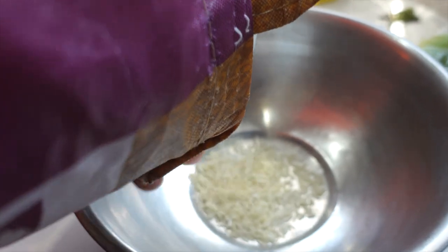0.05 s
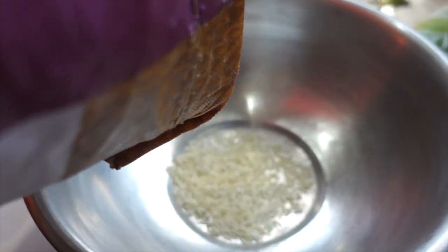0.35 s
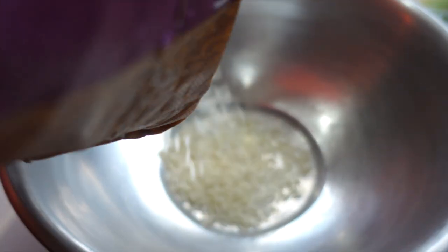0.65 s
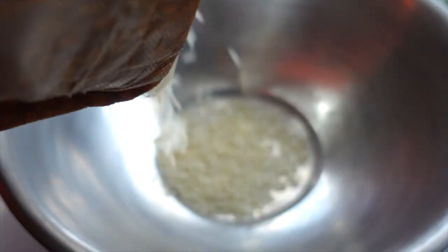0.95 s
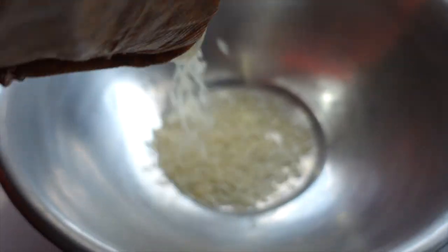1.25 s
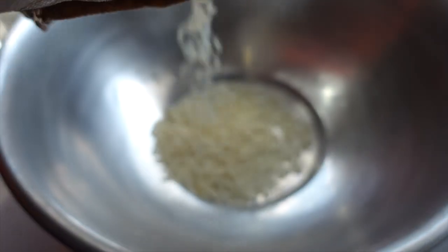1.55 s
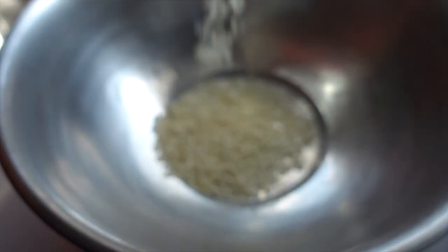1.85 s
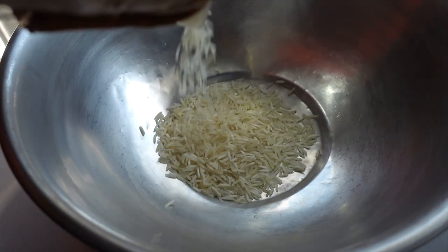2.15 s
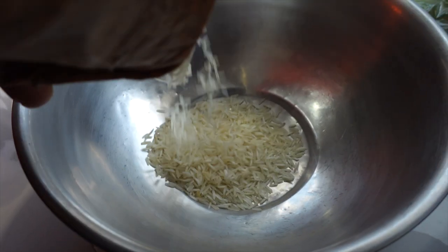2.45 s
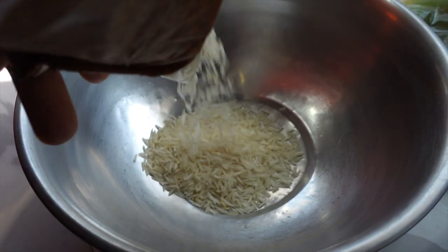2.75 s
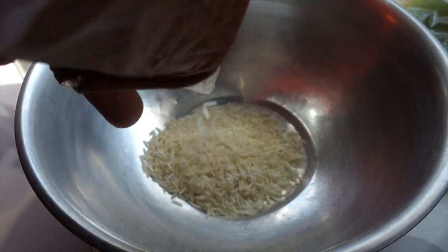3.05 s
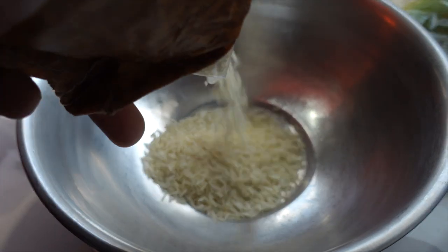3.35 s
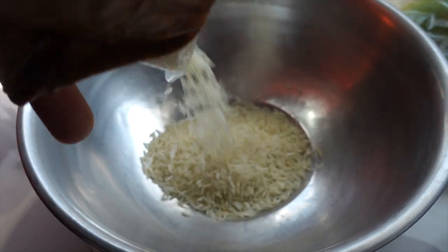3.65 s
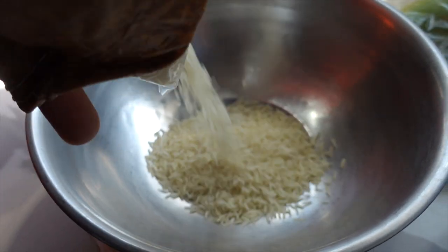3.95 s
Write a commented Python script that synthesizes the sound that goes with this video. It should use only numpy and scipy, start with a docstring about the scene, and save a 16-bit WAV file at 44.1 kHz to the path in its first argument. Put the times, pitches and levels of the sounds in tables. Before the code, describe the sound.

Rice grains patter from a crackling bag into a metal bowl in an uneven stream.

```python
"""Dry rice pours from a bag into a steel bowl, close by in a kitchen.
Grains patter on the heap; those that hit bare steel tick brightly and make the bowl ring.
The stream swells and thins, with small clumps and stray grains. The bag buckles with short pops,
and the bowl takes a few soft knocks. Faint air noise and an appliance hum lie behind it all."""
import sys
import numpy as np
from scipy import signal
from scipy.fft import rfft, irfft
from scipy.io import wavfile
from scipy.ndimage import uniform_filter1d

SR = 44100
rng = np.random.default_rng(int(sys.argv[2]) if len(sys.argv) > 2 else 0)


def persist_wave(psi):
    """Save psi, clipped to +-1, as 16-bit WAV."""
    counts = np.round(np.clip(psi, -1, 1) * 32767).astype(np.int16)
    wavfile.write(sys.argv[1], SR, np.atleast_2d(counts).T)


N = 176400  # 4 seconds

# how strongly the rice flows (time [s], bright ticks [dB], dull patter [dB])
RICE_FLOW = [(0.0, -25, -35), (0.11, -35.5, -44.5), (0.13, -36.5, -40.5), (0.29, -50.5, -49.5),
             (0.36, -58, -52), (0.435, -59.5, -51), (0.50, -41.5, -44), (0.63, -49, -41), (0.645, -39, -42),
             (0.695, -26.5, -31), (0.715, -20.5, -33.5), (1.01, -22, -38), (1.047, -28, -33.5),
             (1.056, -21, -33.5), (1.27, -21.5, -37.5), (1.44, -41, -44.5), (1.51, -39, -42),
             (1.55, -32, -38), (1.575, -34.5, -40.5), (1.85, -40.5, -40.5), (2.02, -37.5, -36),
             (2.19, -28.5, -40), (2.22, -27.5, -39), (2.36, -31, -39), (2.44, -26, -36.5),
             (2.61, -26.5, -40), (2.73, -39, -40), (2.79, -30.5, -40.5), (2.858, -41, -35.5),
             (2.87, -29.5, -35.5), (3.02, -30, -38), (3.22, -38.5, -39), (3.352, -41, -36.5),
             (3.36, -29, -34), (3.44, -33, -36.5), (3.47, -26, -33), (3.61, -23, -34.5), (3.78, -21, -34.5),
             (4.0, -22, -31)]
# grains that land together (time [s], level [dB])
RICE_CLUMPS = [(0.025, -25), (0.043, -46), (0.087, -22), (0.193, -35.5), (0.239, -32.5), (0.376, -39),
               (0.394, -36.5), (0.444, -34.5), (0.475, -36), (0.488, -46), (0.512, -25), (0.519, -43.5),
               (0.558, -31), (0.637, -32), (0.648, -24.5), (0.709, -22), (1.053, -17.5), (1.585, -23.5),
               (1.722, -27), (1.88, -28.5), (1.929, -29.5), (1.982, -25.5), (2.042, -28), (2.195, -31),
               (2.212, -20.5), (2.233, -22), (2.305, -25.5), (2.375, -22), (2.42, -24.5), (2.446, -19.5),
               (2.482, -21), (2.589, -23.5), (2.606, -28), (2.672, -24.5), (2.772, -24), (2.864, -26),
               (2.923, -29), (3.137, -30), (3.357, -21.5), (3.378, -35), (3.45, -20.5), (3.465, -22),
               (3.488, -21), (3.541, -18), (3.636, -17.5), (3.723, -22), (3.919, -18)]
# tone of grains on steel (frequency [Hz], level [dB])
TICK_TONE = [(300, -77), (1000, -38), (3900, -27), (4500, -1), (5100, 0), (6000, 1.45), (8000, 1.26),
             (9700, 0), (11200, -7.5), (13000, -13.5), (15700, -18)]
# tone of grains on the heap (frequency [Hz], level [dB])
PATTER_TONE = [(60, -63), (250, -29), (520, -20.5), (700, -3), (870, -4.5), (1200, 1.5), (2000, 1.5),
               (2900, 4), (4800, 2.5), (8000, -1.5), (15000, -22)]
# how much rice hits bare steel (time [s], ring compared with the ticks [dB])
STEEL_CONTACT = [(0, -9), (.6, -3), (.72, -3), (.9, 1), (1.27, 1), (1.5, -16), (2.1, -13), (2.22, -2),
                 (2.6, -5), (2.75, -16), (4, -19)]
# how much rice hits the bowl's sloping side (time [s], level [dB])
SLOPE_CONTACT = [(1.3, -2), (1.5, -8)]
# notes of the steel wall (pitch [Hz], level [dB], time to fade 60 dB [s], place [0 base, 1 slope])
WALL_NOTES = [(1136, 0, 0.028, 0), (1268, 2, 0.023, 0), (1510, -7, 0.013, 1), (4203, 7, 0.039, 1),
              (4750, -2, 0.052, 1), (5445, 6.5, 0.026, 0), (5540, 9, 0.066, 0), (5920, 2, 0.036, 0),
              (6006, 10, 0.053, 1), (6190, -3.5, 0.064, 1), (6270, 4, 0.059, 0), (6810, 3, 0.067, 1),
              (6760, 3, 0.12, 0)]
# the bag buckles (time [s], snap level [dB], pitch [Hz], thump level [dB])
BAG_POPS = [(.302, -16, 1080, -57), (0.4387, -24.5, 1070, -50), (.4612, -6.5, 1880, -49),
            (0.4726, -32, 800, -39.5), (0.5975, -12, 1250, -45.5), (0.6452, -20, 816, -51.5),
            (0.7759, -20.5, 870, -43), (1.029, -31.5, 840, -49), (1.586, -16.5, 2200, -69),
            (2.0445, -20.5, 1250, -71), (2.217, -26, 1000, -63), (2.2325, -13.5, 1180, -37),
            (3.099, -36, 1190, -48), (3.182, -22, 1060, -63), (3.304, -19, 1700, -64),
            (3.338, -12.5, 1360, -41), (3.464, -14.5, 1250, -67), (3.49, -26, 1210, -61),
            (3.665, -25, 1200, -58), (3.719, -26, 885, -39)]
# tone of the bag's thump (frequency [Hz], level [dB])
THUMP_TONE = [(50, -19), (130, -10.5), (260, 2), (550, 7), (1000, -4), (3000, -45)]
# soft knocks on the bowl (time [s], level [dB])
BOWL_KNOCKS = [(1.76, -57), (1.947, -53), (2.011, -54), (2.233, -40), (2.35, -46), (3.11, -54),
               (3.667, -51)]
# low notes of the whole bowl (pitch [Hz], level [dB], time to fade 60 dB [s])
BOWL_NOTES = [(161, -10.5, 0.036), (292, 2.5, 0.059), (375, -17, 0.13)]
# tone of the kitchen air (frequency [Hz], level [dB])
AIR_TONE = [(25, -8), (60, 5), (200, 3), (700, -2), (3000, -4), (15000, -3)]
# how wide the sound spreads (frequency [Hz], gain of the side signal [dB])
STEREO_WIDTH = [(200, -14), (2000, -26), (4000, -22.5), (6000, -18), (8000, -9), (14000, -9)]
# which way the sound leans (frequency [Hz], left compared with right [dB])
STEREO_BALANCE = [(200, .5), (1200, -0.5), (4500, -1), (8000, -2.6), (12000, 0.8)]

TICKS_PER_S, PATTERS_PER_S, FULL_FLOW_DB = 1100, 2200, -25  # grain rates at this flow level
RATE_DB_PER_DB, PATTER_BOOST_DB, SIZE_SPREAD_DB = 0.5933, 5, 3
SURGES_PER_S, SURGE_S, SURGE_SHARE = 360, 0.0044, 0.2
TOUCH_S, RATTLE_S, RATTLE_DB = 0.001, 0.005, 8
CLUMP_S, CLUMP_GRAINS_PER_S, FIRST_GRAIN_DB = 0.013, 4000, 6
CLUMP_DULL_DB, CLUMP_DULL_SHARE = -3, 0.46  # a clump takes on part of the stream's dullness
STRAYS_PER_S, STRAY_DB, CLEAN_TICK_S = 150, -15, 0.0012
DETUNE = 0.006  # rough share by which rice shifts a wall note
SNAP_CYCLES, THUMP_S = 0.8, 0.014
CRACK_S, CRACK_DB, CRACK_AT_HZ, CRACK_DB_PER_OCTAVE = 0.0007, -13.5, 1460, 15.5
ECHO_DELAY_S, ECHO_FADE_S, ECHO_DB = 0.00238, 0.0013, -10
HANDLING_SIDE_DB, HANDLING_SPREAD_S = 7.5, 0.0015
AIR_DB, HUM_DB, HUM_HZ = -73.5, -88, 98
ROOM_FADE_S, ROOM_MID_DB, ROOM_SIDE_DB = 0.2, -15.5, -5.5  # the room's echo fades 60 dB in this time


def rice():
    """Grains tick on the steel, patter on the heap and ring the bowl; returns mid and side."""
    bright_db, dull_db = curve(RICE_FLOW, column=1), curve(RICE_FLOW, column=2)
    hard_hits = stream(bright_db, TICKS_PER_S)
    soft_hits = undb(PATTER_BOOST_DB) * stream(dull_db, PATTERS_PER_S)
    clump_hits = clumps()
    stray_hits = strays((bright_db + dull_db) / 2)
    crisp = land(clump_hits + stray_hits, lambda: burst(CLEAN_TICK_S, size=256))
    on_heap = undb(CLUMP_DULL_DB + CLUMP_DULL_SHARE * (dull_db - bright_db))
    ticks = [through(part, tone(TICK_TONE)) for part in land(hard_hits, grain_click) + crisp]
    patter = [through(part, tone(PATTER_TONE)) for part in land(soft_hits, grain_click) + on_heap * crisp]
    steel_hits = (hard_hits + clump_hits) * undb(curve(STEEL_CONTACT))
    return steel_ring(steel_hits) + ticks + patter


def stream(db, per_s):
    """Falling grains: a stronger flow brings more of them."""
    rate = per_s * undb(RATE_DB_PER_DB * (db - FULL_FLOW_DB))
    return grains(undb(db) * surging(), rate)


def surging():
    """The flow bunches up at random: each surge starts at once and dies away."""
    t = np.arange(SR // 10) / SR
    starts = (rng.random(N) < SURGES_PER_S / SR) * 1.
    surges = np.abs(through(starts, np.exp(-t / SURGE_S)))
    surges /= uniform_filter1d(surges, size=4000) + 0.013
    return np.sqrt(1 - SURGE_SHARE + SURGE_SHARE * surges)


def grains(gain, per_s):
    """Hits of uneven size at random times, evened out so that gain sets their overall level."""
    lands = rng.random(N) < per_s / SR
    sizes = undb(SIZE_SPREAD_DB * np.clip(rng.standard_normal(N), -2, 1.6))
    hits = lands * sizes * rng.choice([-1, 1], N)
    power = np.abs(uniform_filter1d(hits ** 2, size=1000))
    return gain * hits / np.sqrt(power + 1e-4)


def grain_click():
    """A grain touches down, then rattles between the walls."""
    return unit(burst(TOUCH_S, size=1024) + undb(RATTLE_DB) * burst(RATTLE_S, size=1024))


def clumps():
    """Grains land together: one starts the clump, and a dense shower quickly fades."""
    shower, first_grains, t = np.zeros(N), np.zeros(N), np.arange(SR // 10) / SR
    for at, db in RICE_CLUMPS:
        add(shower, at, undb(db) * np.exp(-t / CLUMP_S))
        add(first_grains, at, undb([db + FIRST_GRAIN_DB]))
    return first_grains + grains(shower, CLUMP_GRAINS_PER_S)


def strays(db):
    """Single grains jump out of the stream and bounce off the wall."""
    hits = (rng.random(N) < STRAYS_PER_S / SR) * rng.uniform(-0.85, 1, N)
    return undb(db + STRAY_DB) * hits * np.sqrt(SR / STRAYS_PER_S)


def land(hits, response, spots=16):
    """Grains fall on several spots, each with its own sound; returns mid and side."""
    spot = rng.integers(spots, size=N)
    return np.array([sum(through(hits * (spot == k), response()) for k in range(spots))
                     for _ in range(2)])


def steel_ring(hits, spots=12):
    """Grains ring the bowl's base and slope; the rice on each spot puts it slightly out of tune."""
    out, size = np.zeros((2, N)), 4096
    spot, on_slope = rng.integers(spots, size=N), undb(curve(SLOPE_CONTACT))
    total = np.sqrt(sum(undb(db) ** 2 for _, db, _, _ in WALL_NOTES))
    for k in range(spots):
        here = hits * (spot == k)
        for channel in out:
            base, slope = np.zeros((2, size))
            for hz, db, fade_s, place in WALL_NOTES:
                pitch = hz * (1 + DETUNE * rng.uniform(-1.16, 1))
                part = slope if place > .5 else base
                part += undb(db) / total * ring([(pitch, 0, fade_s)], size)
            channel += through(here, base) + through(here * on_slope, slope)
    return cut_bass(out, hz=1400, order=4)  # cut the low rumble, leaving the bright ring


def bag_pops():
    """A panel of the bag snaps over: a short pop, a crack, an echo off the bowl and a low thump."""
    snaps, thumps, t = np.zeros(N), np.zeros(N), np.arange(4096) / SR
    crack_band = signal.butter(2, (1800, 7500), "band", fs=SR, output="sos")
    for at, db, hz, thump_db in BAG_POPS:
        age = hz * t / SNAP_CYCLES
        snap = np.sin(2 * np.pi * hz * t) * 2 * age * np.exp(1 - 2 * age)
        # a tighter, higher snap cracks harder
        crack_db = CRACK_DB + CRACK_DB_PER_OCTAVE * np.log2(hz / CRACK_AT_HZ)
        hiss = 2 * signal.sosfilt(crack_band, rng.standard_normal(len(t)))
        crack = undb(crack_db) * np.exp(-t / CRACK_S) * hiss
        add(snaps, at, undb(db) * (snap + crack))
        add(snaps, at + ECHO_DELAY_S, undb(db + ECHO_DB) * through(snap, burst(ECHO_FADE_S)))
        thump = through(burst(THUMP_S), tone(THUMP_TONE))
        add(thumps, at, undb(thump_db) * peak(thump))
    return thumps + cut_bass(snaps, hz=580, order=3)  # the snaps are heard with little bass below about 580 Hz


def bowl_knocks():
    """Soft, scuffing knocks wake the bowl's low notes, in a new mix each time."""
    out = np.zeros(N)
    for at, db in BOWL_KNOCKS:
        knock = through(burst(decay_s=0.004), ring(BOWL_NOTES, size=8000))
        add(out, at, undb(db) * peak(knock))
    return cut_bass(out, hz=120, order=2)


def room_echo(sound):
    """The room answers with a short wash of echoes."""
    return through(sound, burst(ROOM_FADE_S / np.log(1000), size=20000))


def kitchen():
    """Faint air noise and the steady hum of an appliance."""
    air = through(rng.standard_normal(N), tone(AIR_TONE))
    hum = np.sqrt(2) * np.sin(2 * np.pi * HUM_HZ * np.arange(N) / SR)
    return undb(AIR_DB) * air + undb(HUM_DB) * hum


def undb(db):
    """Turn decibels into a gain to multiply by."""
    return 10 ** (np.asarray(db) / 20)


def curve(table, column=1):
    """One column of a table, joined by straight lines in time."""
    table = np.array(table)
    return np.interp(np.arange(N) / SR, table[:, 0], table[:, column])


def unit(x):
    """Scale to an energy of one."""
    return x / np.sqrt(np.sum(x ** 2))


def peak(x):
    """Scale to a peak of one."""
    return x / np.abs(x).max()


def gains(table, size):
    """Turn a tone table into a gain for each frequency."""
    hz, db = np.array(table).T
    return undb(np.interp(np.log(np.fft.rfftfreq(size, 1 / SR) + 1), np.log(hz), db))


def tone(table, size=2048):
    """A short click with the tone that the table gives."""
    cepstrum = irfft(np.log(gains(table, size)))
    # folding onto the first half packs the energy at the click's start
    cepstrum[1:size // 2] *= 2
    cepstrum[size // 2 + 1:] = 0
    return unit(irfft(np.exp(rfft(cepstrum)))[:size // 2])


def through(x, response):
    """Let every sample of a sound set off a copy of the response."""
    return signal.oaconvolve(x, response)[:N]


def burst(decay_s, size=4096):
    """Noise that dies away."""
    return unit(rng.standard_normal(size) * np.exp(-np.arange(size) / SR / decay_s))


def ring(notes, size):
    """Fading pure notes, each starting at a random point in its wave."""
    t, out = np.arange(size) / SR, np.zeros(size)
    for hz, db, fade_s in notes:
        wave = np.sin(2 * np.pi * (hz * t + rng.random()))
        out += undb(db) * unit(wave * np.exp(-np.log(1000) * t / fade_s))
    return unit(out)


def add(out, at_s, sound):
    """Mix a sound in at a given time."""
    start = max(int(at_s * SR), 0)
    out[start:start + len(sound)] += sound[:N - start]


def cut_bass(x, hz, order):
    """Turn down everything below hz; a higher order cuts more steeply."""
    return signal.sosfilt(signal.butter(order, hz, "high", fs=SR, output="sos"), x)


def scene():
    """Rice, bag and bowl just ahead. Mid is what both ears share; side makes the sound wide."""
    mid, side = rice()
    handling = bag_pops() + bowl_knocks()
    mid = mid + handling
    spread = through(handling, burst(HANDLING_SPREAD_S))  # reaches the sides by way of the bowl
    side = side + undb(HANDLING_SIDE_DB) * spread + undb(ROOM_SIDE_DB) * room_echo(mid)
    side = irfft(rfft(side) * gains(STEREO_WIDTH, N), N)
    mid = mid + undb(ROOM_MID_DB) * room_echo(mid) + kitchen()
    lean = np.sqrt(gains(STEREO_BALANCE, N))
    left = irfft(rfft(mid + side) * lean, N)
    right = irfft(rfft(mid - side) / lean, N)
    return np.array([left, right])


def record(dry):
    """Cut off the very highest treble."""
    top_hz = 15650
    return signal.sosfilt(signal.ellip(10, .2, 80, top_hz, fs=SR, output="sos"), dry)


dry = scene()
out = record(dry)
persist_wave(out)
```